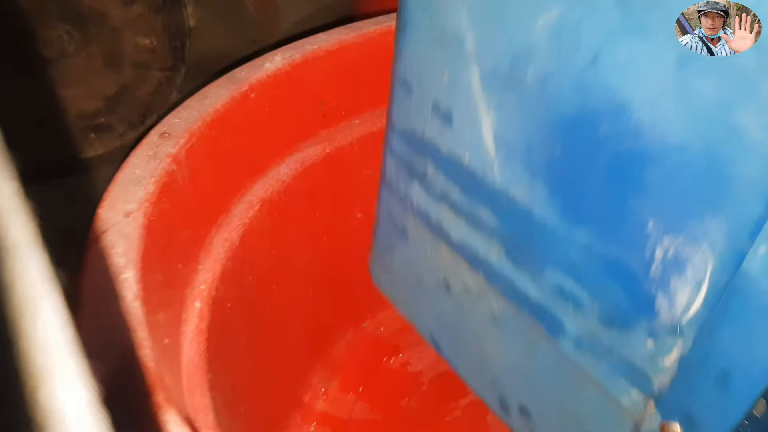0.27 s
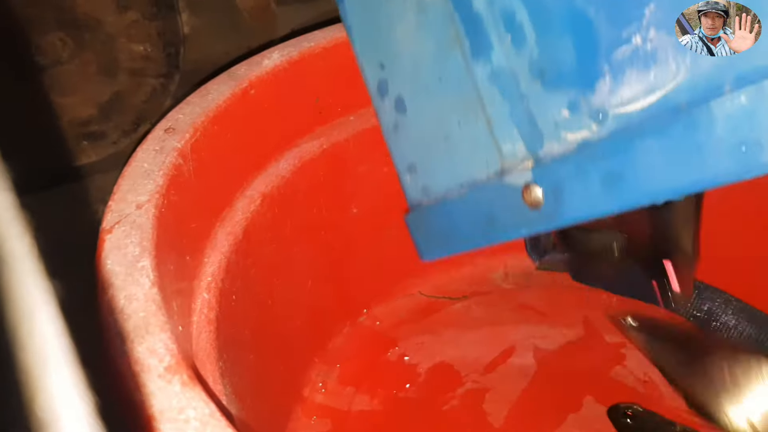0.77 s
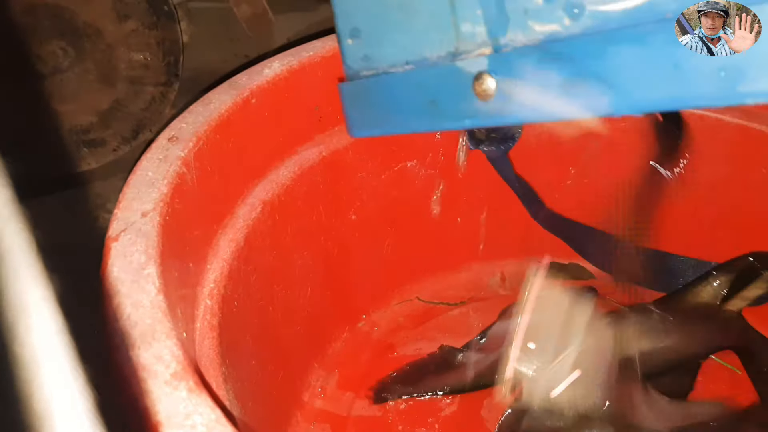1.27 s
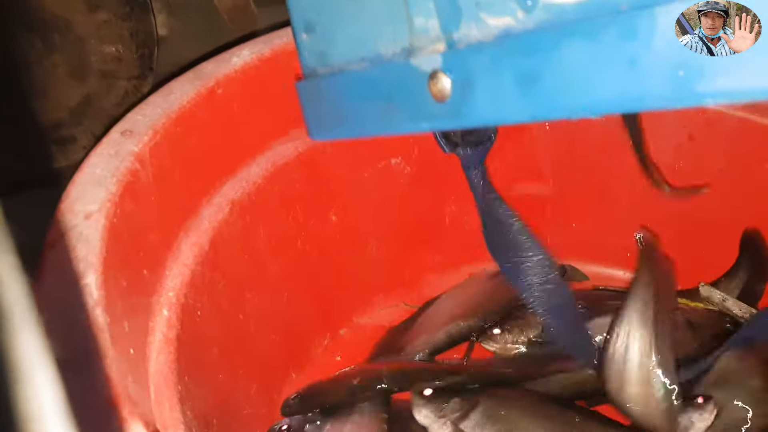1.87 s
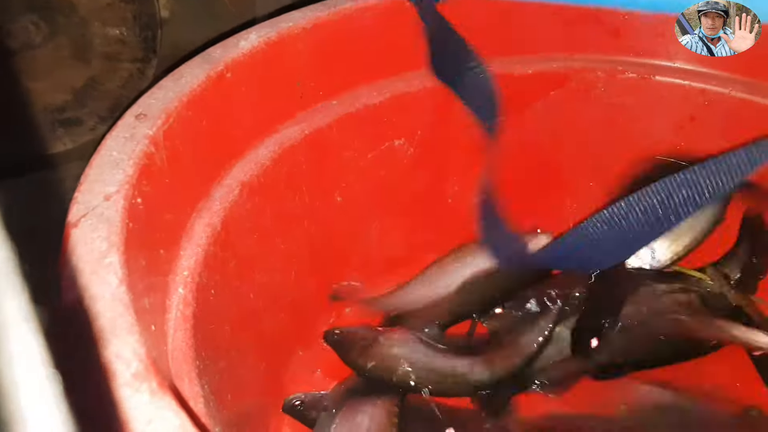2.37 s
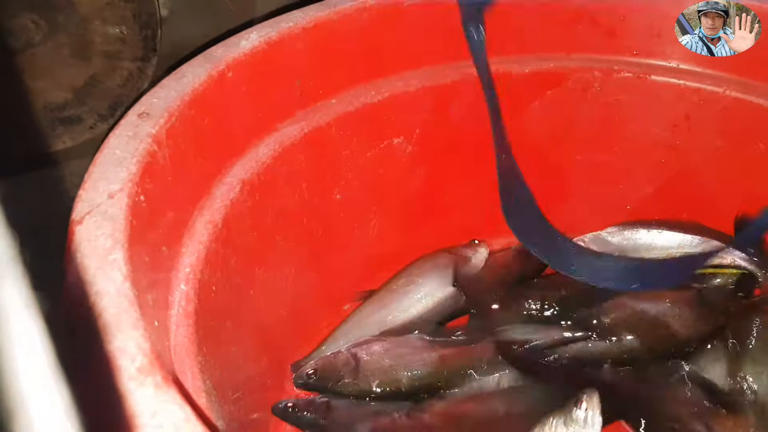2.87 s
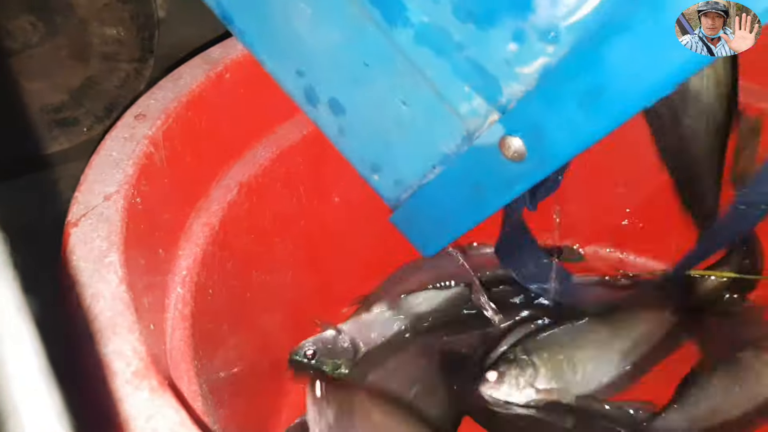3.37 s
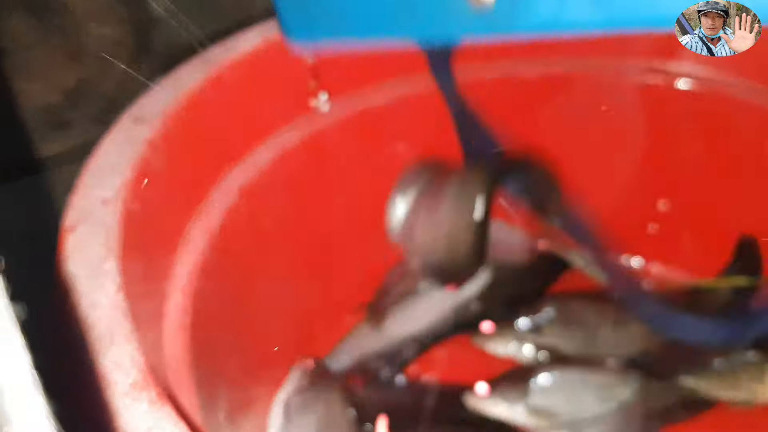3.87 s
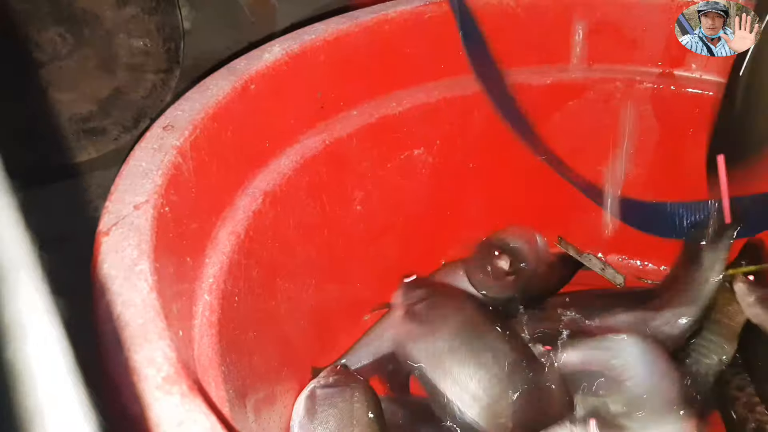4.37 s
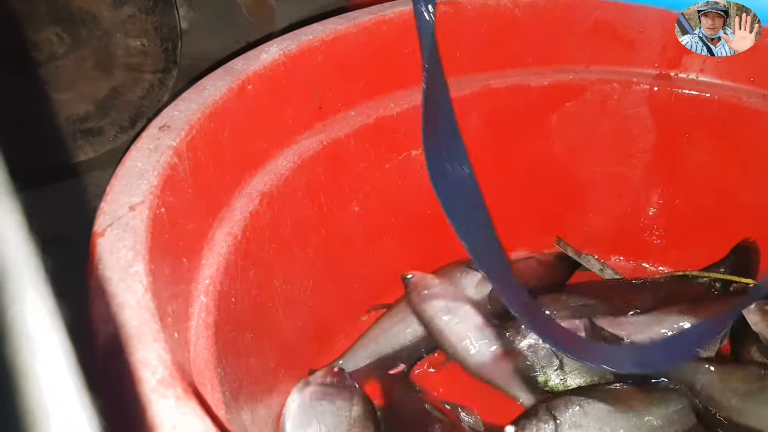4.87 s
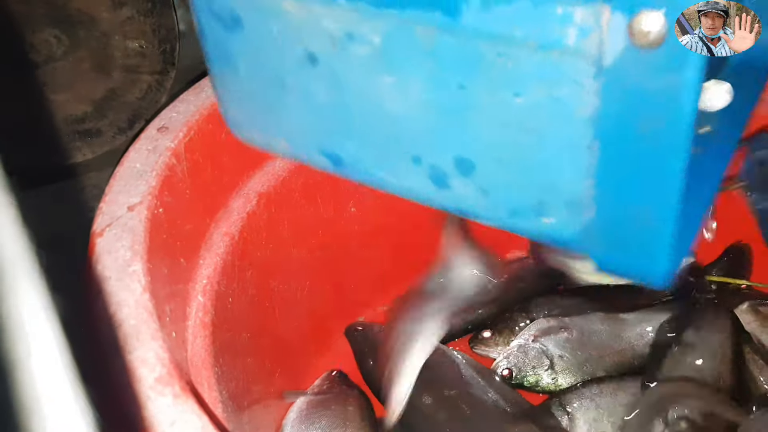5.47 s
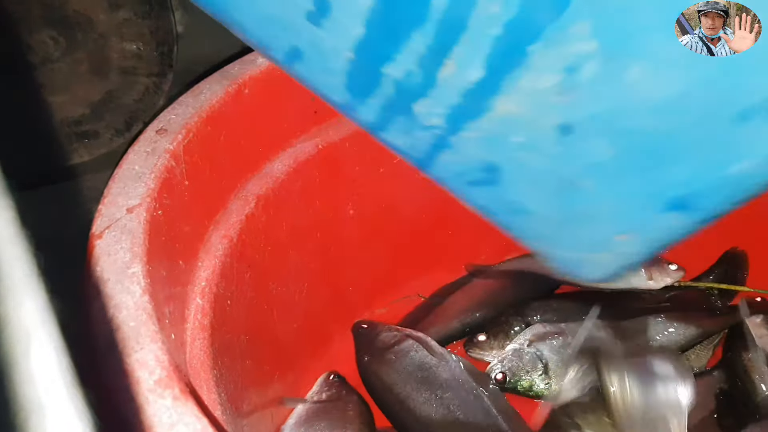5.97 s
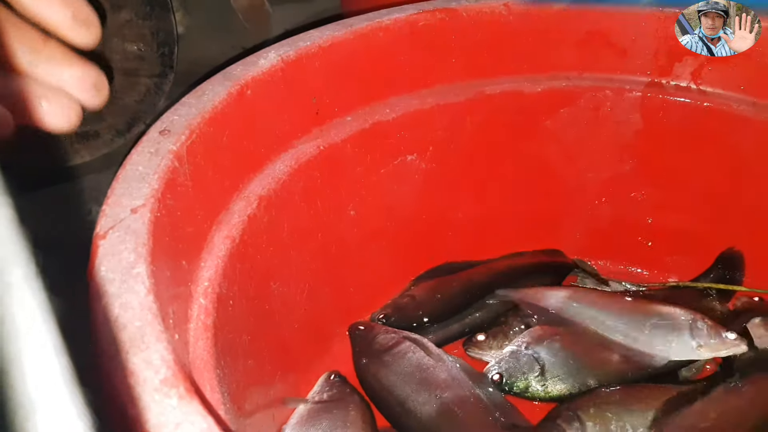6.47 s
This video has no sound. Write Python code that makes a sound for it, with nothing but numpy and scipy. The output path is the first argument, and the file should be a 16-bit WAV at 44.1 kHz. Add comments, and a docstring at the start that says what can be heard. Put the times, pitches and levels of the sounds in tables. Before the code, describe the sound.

A close stereo scene of live fish dropping from a plastic box into a plastic tub, over steady low rumble and faint hiss. It starts at once with a heavy hollow thump and sharp knocks, then a brief wet slide. Around 0.6-0.7 s more bodies land with damp slaps. From 0.95 to 1.7 s thumps and raps come thickly, ending in a hard knock. Around 2 s the plastic eases and wet slithering takes over; from 2.2 to 3.2 s quick tail slaps and droplets spatter, with two knocks near 3.2 s. Strong slaps and a loud rap hit at 3.5-3.65 s, then the loudest flapping knocks at 4.0-4.1 s. Weaker taps follow until two low thumps near 5.0-5.2 s. The rest is sparse: soft slithers, tiny smacks and faint knocks to about 6.5 s.

```python
"""Live fish slide out of a plastic box into a plastic tub, close to a two-port microphone.
Bodies thump and heads and fins knock: struck modes of the plastic walls ring and die away.
Wet tails slap and spatter: short noise cracks, each followed by a grainy burst of droplets.
Skins rub and slither: noise through the wall modes and wet hiss, both rising around each event.
A low rumble and a faint hiss, both steady beds of shaped noise, fill the yard."""
import sys
import numpy as np
from scipy import signal
from scipy.fft import rfft, irfft, next_fast_len
from scipy.io import wavfile
from scipy.ndimage import map_coordinates

SR = 44100
rng = np.random.default_rng(int(sys.argv[2]) if len(sys.argv) > 2 else 0)


def bounce(signal):
    """Save signal as a 16-bit WAV file at the path given by the first command-line argument."""
    frames = np.transpose(np.atleast_2d(signal))
    limited = np.clip(frames, -1, 1)
    pcm = np.round(limited * 32767).astype(np.int16)
    wavfile.write(sys.argv[1], SR, pcm)


N = 296793

# Soft bodies landing on the plastic: (t/s, peak level/dB, favoured f/Hz)
THUMPS = [(0.039, -0.5, 281), (0.31, -17.5, 222), (0.426, -22.5, 222), (0.532, -24, 127), (0.641, -12, 235),
          (0.706, -11.5, 268), (1.103, -22, 140), (1.153, -10, 263), (1.325, -21, 145), (1.393, -4.5, 240),
          (1.515, -11.5, 151), (1.601, -15, 245), (1.696, -15.5, 212), (3.432, -25, 146), (4.142, -29, 151),
          (3.499, -18.5, 420), (3.636, -16, 212), (4.346, -29, 149), (4.529, -30, 266), (4.935, -27.5, 246),
          (5.041, -9.5, 274), (5.185, -12.5, 283), (5.291, -31, 157), (5.542, -29, 147)]
# Heads and fins rapping the plastic: (t/s, peak level/dB, favoured f/Hz)
KNOCKS = [(0.01, -8, 720), (0.025, -2.5, 794), (0.088, -11.5, 620), (0.243, -23, 1120), (0.266, -19.5, 730),
          (0.404, -20.5, 700), (0.53, -22, 636), (0.643, -15.5, 623), (0.709, -11.5, 690),
          (0.957, -15, 755), (1.125, -5.5, 860), (1.155, -11.5, 635), (1.193, -12.5, 790),
          (1.325, -13, 600), (1.366, -13.5, 620), (1.475, -14, 646), (1.599, -16, 685), (1.695, -2, 810),
          (2.384, -18, 676), (2.462, -24, 1370), (2.533, -17.5, 684), (3.157, -5, 655), (3.246, -6.5, 600),
          (3.501, -15, 686), (3.534, -14.5, 627), (3.641, -3, 810), (3.829, -24, 600), (3.994, -10.5, 1050),
          (4.061, 0.5, 806), (4.084, -6, 775), (4.351, -24.5, 650), (4.457, -17.5, 700), (4.518, -21, 634),
          (4.602, -24.5, 630), (4.666, -18.5, 666), (4.861, -24.5, 696), (5.349, -30, 715),
          (5.952, -19.5, 880), (6.299, -24, 730), (6.336, -27, 1040)]
# Wet slaps: (t/s, nominal level/dB, fine spray relative to the smack/dB, heard as brightness)
SLAPS = [(0.0084, -18.5, -18), (0.0229, -15.5, -15), (0.0422, -16, -40), (0.616, -13, -17),
         (0.6409, -19.5, -28), (0.6657, -23.5, -37), (0.9549, -17, -20.5), (1.0042, -25, -31),
         (1.1545, -18.5, -9), (1.203, -27, -5), (1.3229, -19, -23), (1.4302, -16.5, -13),
         (1.531, -33.5, -19), (1.6412, -25, -22), (1.6856, -16, -9), (1.7195, -20, -35), (1.9275, -40, -14),
         (2.2195, -33.5, -11), (2.2539, -26, -10.5), (2.2829, -18, -18), (2.385, -21.5, -9),
         (2.4465, -25.5, -9), (2.4643, -21, -24), (2.5315, -20.5, -11.5), (2.5712, -31, 1),
         (2.6214, -40.5, -12), (2.7273, -31.5, -6), (2.7627, -20.5, -3), (2.7958, -21, -12),
         (2.807, -32, 6), (2.9259, -17, -6), (2.9639, -19, -9.5), (2.9985, -31, -7), (3.0344, -20.5, -12.5),
         (3.0712, -20.5, -17), (3.1213, -21.5, -7), (3.131, -15, -11.5), (3.1572, -22, -2),
         (3.202, -32, 13), (3.222, -23, -7), (3.3985, -30.5, -3), (3.4978, -10, -16), (3.5374, -11, -15.5),
         (3.5532, -17.5, -19), (3.605, -32.5, 13), (3.6438, -15.5, -13.5), (3.6805, -23, -47.5),
         (3.8693, -38.5, 2), (3.9533, -29, -15), (4.015, -13, -2), (4.071, -7, -8.5), (4.105, -27, -35),
         (4.2348, -34, 5), (4.259, -37.5, -11), (4.348, -18.5, -37), (4.4445, -24.5, -10),
         (4.6488, -30.5, -18), (5.0441, -21.5, -26), (5.0789, -21.5, -15.5), (5.1401, -17, -24.5),
         (5.1876, -25, -25), (5.3467, -25.5, -30), (5.4295, -35.5, -12), (5.461, -31, -13),
         (5.6291, -30.5, -19), (5.656, -34, 2), (5.814, -31.5, -3), (5.8378, -30, -7.5),
         (6.0859, -26.5, -26), (6.094, -25.5, -14), (6.2978, -32.5, -3), (6.3349, -35, -20)]
# Modes of the plastic walls: (f/Hz, level/dB, undamped T60/s)
WALL_MODES = [(99, -3, 0.14), (143.3, 0.5, 0.33), (189.5, -0.5, 0.079), (245.2, 4, 0.14),
              (322.5, 0.5, 0.12), (380.6, -2, 0.18), (627.3, -2, 0.069), (723.5, -8.5, 0.091),
              (877, -13.5, 0.11), (995, -7, 0.083), (1235, -15, 0.26)]
# Likeness of left and right, 1 = identical: (f/Hz, likeness)
STEREO_LIKENESS = [(290, 0.99), (640, 0.92), (1400, 0.01), (15000, 0.0082)]
# Spectrum of wet skin: (f/Hz, relative level/dB)
WET_SPECTRUM = [(300, -2.5), (700, -1), (1500, -3), (2700, 1.5), (3900, -5.5), (4900, -1.5), (6500, -7.5),
                (12500, -17), (15400, -25.5), (16700, -67)]


def amp(db):
    """Gain of a level in dB."""
    return 10 ** (np.asarray(db) / 20)


def unit(x):
    """Scaled to rms 1."""
    return x / np.sqrt(np.mean(x ** 2) + 1e-20)


def along(points, hz):
    """Curve of (Hz, value) points, read on a log frequency axis."""
    f, v = np.transpose(points)
    return np.interp(np.log(hz + 1), np.log(f + 1), v)


def wet_gain(hz):
    """Gain of the wet-skin spectrum."""
    return amp(along(WET_SPECTRUM, hz))


def wobble(rate):
    """A smooth random curve with rate knots a second."""
    knots = rng.standard_normal(int(N * rate / SR) + 4)
    return map_coordinates(knots, [np.arange(N) * rate / SR])


def filtered(x, response):
    """Filters x with a response given as a function of frequency."""
    m = next_fast_len(N + 8192)  # padding keeps the tail from wrapping round
    return irfft(rfft(x, m) * response(np.fft.rfftfreq(m, 1 / SR)), m)[..., :N]


def mid_side_gains(hz):
    """Shares of mid and side noise that give the left-right likeness at each frequency."""
    turn = np.arccos(np.clip(along(STEREO_LIKENESS, hz), -1, 1)) / 2
    return np.array([np.cos(turn), np.sin(turn)])


def rush(gain):
    """Stereo noise of rms 1: alike in the bass, unrelated in the treble."""
    noise = rng.standard_normal((2, N))
    mid, side = filtered(noise, lambda hz: gain(hz) * mid_side_gains(hz))
    return unit(np.array([mid + side, mid - side]))


def add(track, s, sound):
    """Mixes a sound into a track at time s."""
    start = max(round(s * SR), 0)
    track[..., start:start + sound.shape[-1]] += sound


def trail(events, level_db, follows, lead_s, t60_s):
    """Scuffle around each event: builds up just before, dies by 60 dB in t60_s; powers add.

    level_db belongs to a 0 dB event; follows is the share of the event's dB that it takes on."""
    s, db = np.transpose(events)[:2, :, None]
    steps = np.arange(0, N + 32, 32) / SR
    away_db = -60 * np.maximum((s - steps) / lead_s, (steps - s) / t60_s)
    level = np.sqrt(np.sum(amp(2 * (level_db + follows * db + away_db)), axis=0))
    return np.interp(np.arange(N) / SR, steps, level)


def wall_response(hz):
    """Sum of the wall modes as resonant bands, narrower where the ring is longer."""
    total = 0
    for mode_hz, db, t60 in WALL_MODES:
        width = 1j * hz * (3 / t60)
        total = total + amp(db) * width / (mode_hz * mode_hz - hz * hz + width)
    return total


def sliding():
    """Bodies rub the walls into their modes; wet skins hiss and smack faintly at random."""
    # How much the heap of fish slides about: (t/s, rub on the plastic level/dB, nominal wet slither level/dB)
    stir = [(0.0, -45.5, -69), (1.05, -41.5, -52), (1.55, -43, -48), (1.93, -44.5, -52),
            (2.08, -62.5, -45.5), (2.25, -51.5, -65), (2.44, -42, -42.5), (2.81, -49.5, -43),
            (3.07, -48.5, -44.5), (3.32, -51, -49), (3.6, -42, -46), (3.75, -51, -48.5), (4.4, -46.5, -56),
            (4.72, -67.5, -62.5), (4.91, -42.5, -48), (5.04, -56, -54), (5.23, -56, -81), (5.77, -52, -61),
            (6.19, -52.5, -55.5), (6.73, -62.5, -53.5)]
    # A fish slides along the plastic: (start t/s, length/s, nominal wet slither level/dB)
    slide_events = [(0.252, 0.22, -46), (0.519, 0.084, -53.5), (0.783, 0.19, -55), (4.022, 0.035, -33),
                    (5.775, 0.095, -49), (6.035, 0.13, -49)]
    edge_s, rub_over_slither_db = 0.013, 1.5  # fade at either end of a slide; its rub level
    squirm_db, flutter_db = 5.5, 4.47
    now = np.arange(N) / SR

    start, length, slide_db = np.transpose(slide_events)[..., None]
    to_edge = np.minimum(now - start, start + length - now)
    slides = np.sum(amp(slide_db) * np.clip(to_edge / edge_s, 0, 1), axis=0)

    s, rub_db, wet_db = np.transpose(stir)
    rub = amp(np.interp(now, s, rub_db)) + amp(rub_over_slither_db) * slides
    rub += trail(THUMPS + KNOCKS, level_db=-31, follows=0.71, lead_s=0.048, t60_s=0.23)
    wet = amp(np.interp(now, s, wet_db)) + slides
    wet += trail(SLAPS, level_db=-39, follows=0.41, lead_s=0.15, t60_s=0.53)

    squirm = squirm_db * np.tanh(wobble(21.93))  # the wriggling swells and ebbs within bounds
    rubbing = rub * amp(squirm + flutter_db * wobble(60)) * rush(wall_response)
    hiss = wet * amp(squirm - 9.5) * rush(wet_gain)

    # faint smacks at random times, stronger where the slither is stronger
    when = rng.uniform(size=450) * now[-1]
    size_db = 20 * np.log10(np.interp(when, now, wet)) + 5 + 5 * rng.standard_normal(size=450)
    spray_db = -15 + 6 * rng.standard_normal(size=450)
    return rubbing + hiss + splats(zip(when, size_db, spray_db), spatter_db=-17.5)


def yard():
    """Low rumble, slowly uneven, and a steady hiss."""
    # Spectrum of the rumble: (f/Hz, relative level/dB)
    rumble_spectrum = [(22, -52), (32, -14.5), (76, -5.5), (149, -15), (190, -25), (439, -31), (734, -55),
                       (5400, -88)]
    rumble_db, sway_db, hiss_db = -43, 1.5, -63.0
    sway = amp(rumble_db + sway_db * wobble(2.87))
    rumble = sway * rush(lambda hz: amp(along(rumble_spectrum, hz)))
    return rumble + amp(hiss_db) * rush(wet_gain)


def droplets(count, spread_db):
    """Roughness of wet contact: scattered short spikes over a steady part."""
    places = rng.integers(0, N + SR, count)
    heights = amp(spread_db * rng.exponential(size=count))
    spikes = np.bincount(places, heights, N + SR)
    decay = np.exp(-1 / (0.0033 * SR))  # 3.3 ms time constant
    return unit(.5 + signal.lfilter([1], [1, -decay], spikes))


def splats(table, spatter_db, colour_db=5):
    """A crack of a few ms, then a spatter of droplets; each splat has a colour of its own."""
    out, t = np.zeros((2, N + SR)), np.arange(5000) / SR
    hz = np.fft.rfftfreq(len(t), 1 / SR)
    stereo = mid_side_gains(hz)
    rise = 1 - np.exp(-t / 0.00082)
    crack = rise * amp(-60 * t / 0.024)
    spatter = rise * amp(spatter_db - 60 * t / 0.14)
    grain = droplets(count=2000, spread_db=-1)
    octaves = np.log2((hz + 1) / 3000)
    presence = (hz > 1500) & (hz < 7000)  # the band that sets the loudness
    for s, db, spray_db in table:
        bumps_db = colour_db * np.interp(octaves, np.linspace(-3, 3, num=31), rng.standard_normal(31))
        tilt_db = (spray_db + 17.5) * np.clip(octaves / 2, -.4, 1)  # more spray brightens the whole splat
        gain = wet_gain(hz) * amp(tilt_db + bumps_db)
        gain /= np.sqrt(2 * np.sum(gain[presence] ** 2) / len(t))
        mid, side = irfft(rfft(rng.standard_normal((2, len(t)))) * gain * stereo)
        lean = amp(0.82 * rng.standard_normal() * np.array([[1], [-1]]))  # towards left or right
        shape = crack + spatter * grain[round(s * SR):][:len(t)]
        add(out, s, amp(db - 1.5) * lean * shape * np.array([mid + side, mid - side]))
    return out[:, :N]


def slaps():
    """Tails and flanks smack the tub and each other; every knock on the plastic carries a dull smack too."""
    dull = [(s, db - 18.0, -32) for s, db, _ in KNOCKS]
    return splats(SLAPS + dull, spatter_db=-8.5)


def blows(table, reach_oct, contact_cycles, damping):
    """Each blow rings the wall modes near its favoured pitch; the body swells the ring, then damps it."""
    out, t = np.zeros((2, N + SR)), np.arange(SR // 3) / SR
    hz, db, t60 = np.transpose(WALL_MODES)[..., None]
    chance = rng.standard_normal((len(table), len(WALL_MODES), 2))
    for (s, peak_db, favoured_hz), luck in zip(table, chance):
        near_db = -6 * (np.log2(hz / favoured_hz) / reach_oct) ** 2
        swell = 1 - np.exp(-(t * favoured_hz / contact_cycles) ** 2)
        tone = np.sin(2 * np.pi * hz * (1 + 0.037 * luck[:, 1:]) * t)  # every blow detunes the modes
        mode_db = db + near_db + 5.6 * luck[:, :1] - 60 * damping * t / t60
        ring = swell * np.sum(amp(mode_db) * tone, axis=0)
        ring *= amp(peak_db) / np.abs(ring).max()
        lag = abs(6 * luck[0, 1]) / SR  # the left port is a little further from the spot that is hit
        add(out[0], s + lag, ring)
        add(out[1], s, ring)
    return out[:, :N]


def knocks():
    """Hard heads and fins rap the plastic: a brief contact rings the higher wall modes."""
    return blows(KNOCKS, reach_oct=0.51, contact_cycles=0.18, damping=1.91)


def thumps():
    """Soft bodies land on the plastic: a slow contact swells mostly the lower wall modes."""
    return blows(THUMPS, reach_oct=0.65, contact_cycles=1.0, damping=1.6)


def scene():
    """Everything that reaches the microphone."""
    return thumps() + knocks() + slaps() + sliding() + yard()


def record(dry):
    """The microphone loses the deepest bass and a band of treble, rounds off loud peaks, then band-limits."""
    def colour(hz):
        treble_dip_db = -16 * np.exp(-(np.log2((hz + 1) / 8100) / 0.23) ** 2)
        bass_loss = 1 + (30 / (hz + 1)) ** 8
        return amp(treble_dip_db) / bass_loss

    top_hz = 16800
    heard = filtered(dry, colour)
    rounded = heard / (1 + np.abs(heard) ** 6) ** (1 / 6)
    return filtered(rounded, lambda hz: hz < top_hz)


dry = scene()
out = record(dry)
bounce(out)
```